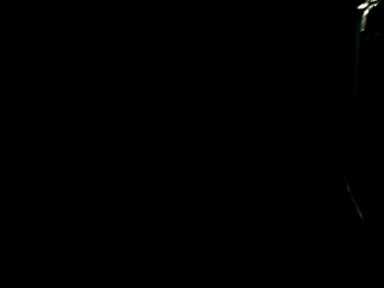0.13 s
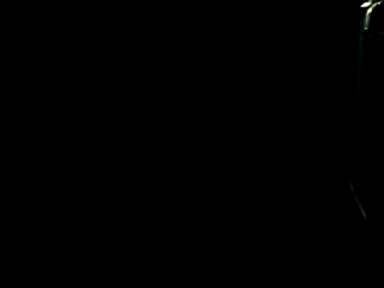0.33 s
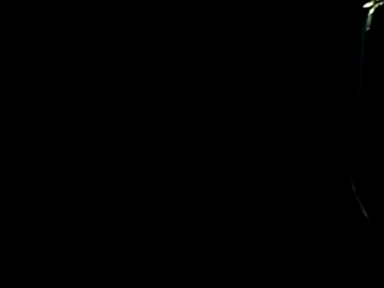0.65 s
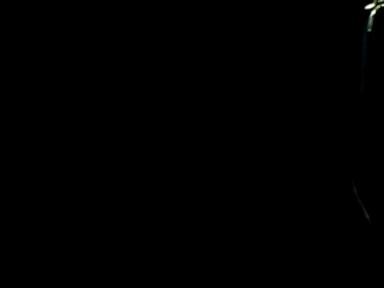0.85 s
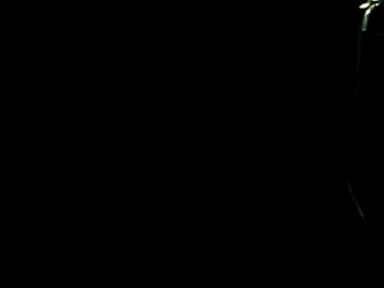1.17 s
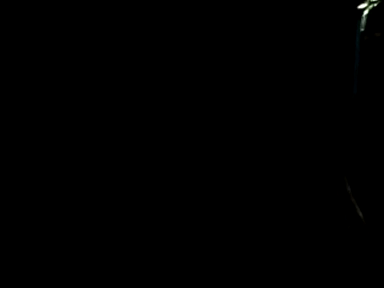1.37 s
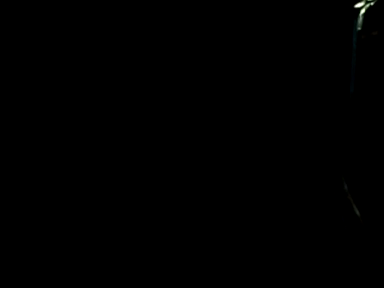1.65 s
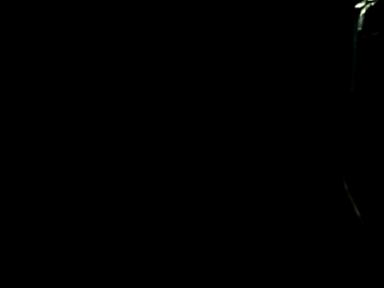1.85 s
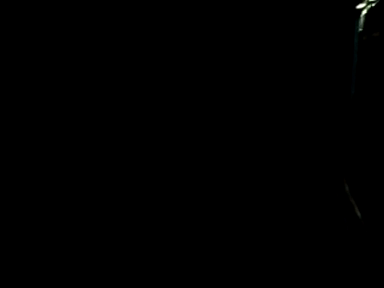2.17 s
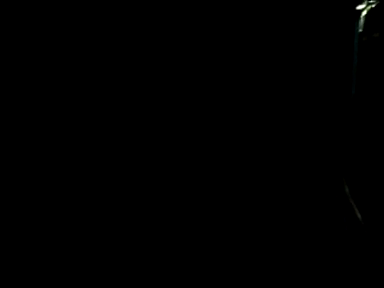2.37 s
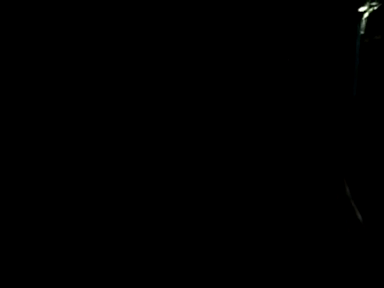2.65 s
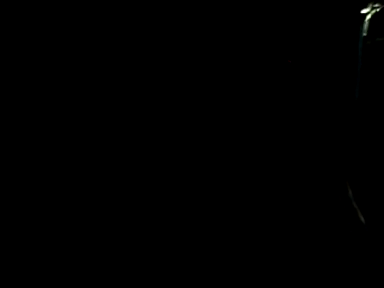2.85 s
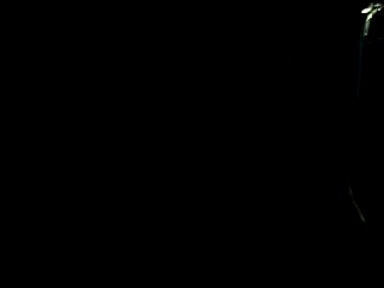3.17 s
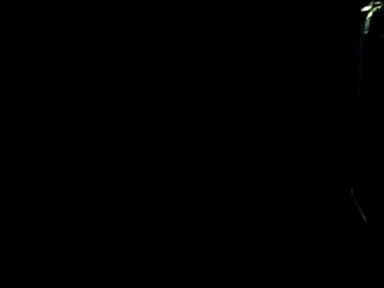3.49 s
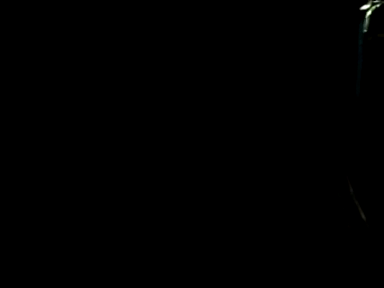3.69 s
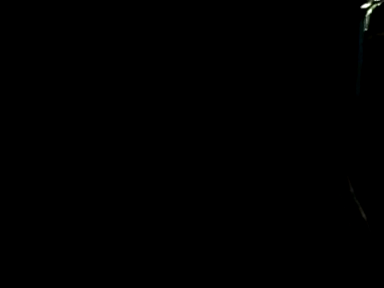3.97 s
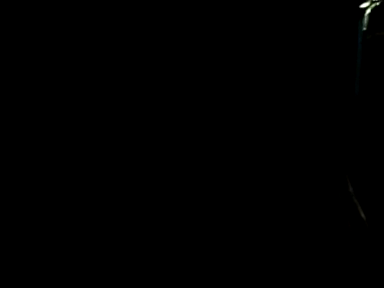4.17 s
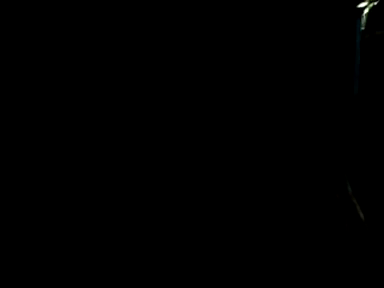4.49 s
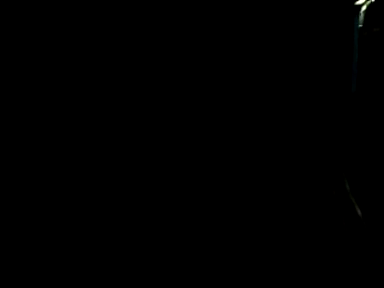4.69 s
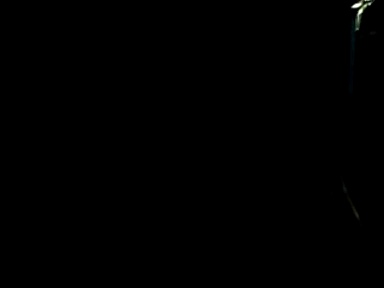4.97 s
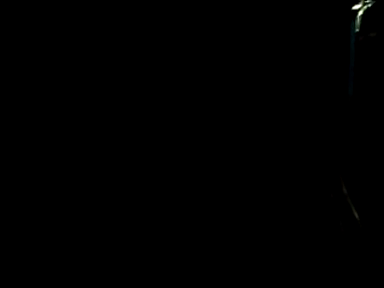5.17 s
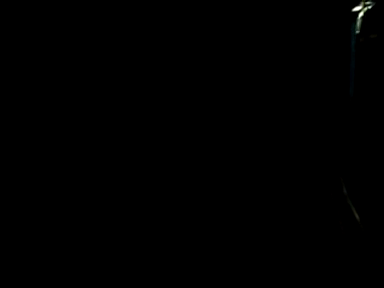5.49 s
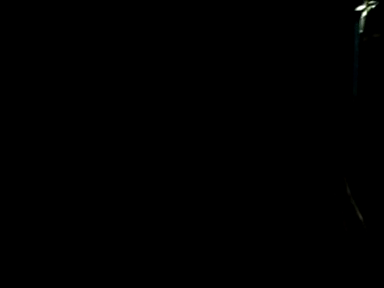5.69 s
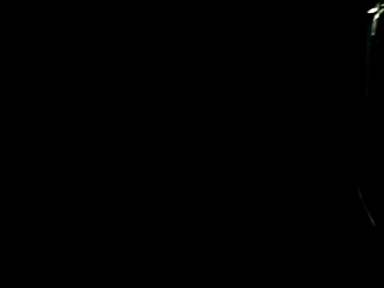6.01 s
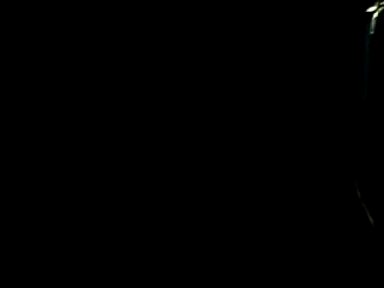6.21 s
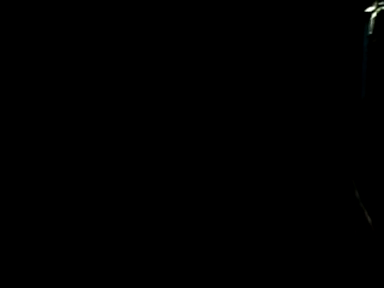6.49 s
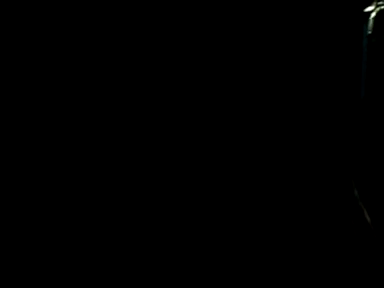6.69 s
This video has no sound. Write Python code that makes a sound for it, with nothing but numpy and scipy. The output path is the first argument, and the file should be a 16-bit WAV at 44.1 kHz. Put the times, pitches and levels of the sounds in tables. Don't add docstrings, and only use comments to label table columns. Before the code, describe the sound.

Wheels pound rough track beneath a passenger coach: uneven sharp clacks, clustered dull thumps, short bright rattles, over a steady low rumbling growl.

```python
import sys
import numpy as np
from scipy import signal
from scipy.io import wavfile

SR = 44100
rng = np.random.default_rng(int(sys.argv[2]) if len(sys.argv) > 2 else 0)


def linear_from_db(decibels):
    return 10 ** (np.asarray(decibels, float) / 20)


def wrap_up_sound(samples):
    columns = np.atleast_2d(samples).T
    tamed = np.clip(columns, -1, 1)
    steps = np.round(tamed * 32767).astype(np.int16)
    wavfile.write(sys.argv[1], SR, steps)


N = 302085


def rms_one(x):
    return x / np.sqrt(np.mean(x ** 2) + 1e-20)


def drift(rate_hz):
    r = np.exp(-80 * np.pi * rate_hz / SR)
    noise = rng.standard_normal(N // 40 + 2002)
    slow = signal.lfilter([1], [1, -2 * r, r * r], noise)[2000:]
    return np.interp(np.arange(N) / 40, np.arange(len(slow)), rms_one(slow))


def resonate(x, hz, width_hz):
    r = np.exp(-np.pi * width_hz / SR)
    return signal.lfilter([(1 - r * r) / 2, 0, (r * r - 1) / 2],
                          [1, -2 * r * np.cos(2 * np.pi * hz / SR), r * r], x)


def ringing_noise(noise, hz, width_hz):
    return rms_one(resonate(resonate(noise, hz, width_hz), hz, width_hz))


def grit(per_s, spread_db):
    sizes = linear_from_db(spread_db * np.minimum(rng.exponential(1, N), 4)) * rng.choice([-1, 1], N)
    hits = rng.random(N) < per_s / SR
    return rms_one(sizes * hits + 1e-18)


def coloured(sources, spectrum, patchy_db, tilt_db=0):
    hz_at, db_at = np.transpose(spectrum)
    octaves = np.log2(hz_at[-1] / hz_at[0])
    edges = hz_at[0] * 2 ** np.arange(0, octaves + 1 / 3, 1 / 3)
    edges = edges[edges < 13000]
    plain, tilted = 0, 0
    for k, (low, high) in enumerate(zip(edges, edges[1:])):
        hz = np.sqrt(low * high)
        band_pass = signal.butter(2, [low, high], "band", fs=SR, output="sos")
        band = signal.sosfilt(band_pass, sources[k % 2])
        level_db = np.interp(np.log(hz), np.log(hz_at), db_at)
        band = band * linear_from_db(level_db + patchy_db * drift(11.4))
        plain = plain + band
        octaves_from_middle = np.log2(hz ** 2 / edges[0] / edges[-1]) / 2
        tilted = tilted + band * linear_from_db(tilt_db * octaves_from_middle)
    return tilted / np.std(plain)


def swells(starts, holds, levels_db, rise_s, db_per_s):
    out, t = np.zeros(N + SR), np.arange(SR) / SR
    for s, hold, db in zip(starts, np.abs(holds), levels_db):
        i = round(s * SR)
        rise = max(rise_s + 0.14 * hold, .001)
        onset = np.sin(np.pi / 2 * np.minimum(t / rise, 1)) ** 2
        out[i:i + SR] += onset * linear_from_db(db - db_per_s * np.maximum(t - rise_s - hold, 0))
    return out[:N]


# start in seconds, hold in seconds, growl in dB, rattle in dB, sizzle in dB.
JOINTS = [
    (0.966, 0.0027, -8.5, -34.5, -25.5),
    (1.45, 0.0027, -14, -31, -31),
    (2.378, 0.03, -16, -33.5, -30.5),
    (4.082, 0.037, -33, -51, -47),
    (5.765, .04, -38, -46, -44),
    (6.391, 0.016, -21.5, -42.5, -34),
]
PATCHES = [(0.097, 0.086, -28, -45, -42.5), (0.27, 0.19, -62, -56, -74), (0.57, 0.021, -60, -48.5, -45),
           (0.908, 0.015, -31, -45.5, -55), (1.39, 0.018, -55, -54.5, -77), (1.92, 0.044, -54.5, -57, -57),
           (2.87, 0.024, -14, -35, -37), (2.917, 0.069, -17.5, -30.5, -33), (3.401, 0.046, -20, -39, -41),
           (3.474, 0.007, -26, -51, -44), (4.361, 0.079, -20, -30.5, -40), (4.585, 0.015, -30.5, -51, -65),
           (4.635, 0.013, -46, -51, -58), (4.814, .01, -32.5, -49.5, -59),
           (4.87, 0.078, -23.5, -41.5, -42.5), (5.03, 0.01, -46, -45.5, -62),
           (5.254, 0.032, -40, -46, -38.5), (5.59, 0.014, -51, -56, -58), (5.83, 0.057, -32, -49, -51),
           (5.894, 0.035, -36, -38, -38.5), (6.235, 0.06, -42, -57, -51), (6.35, .02, -32.5, -51, -52),
           (6.528, 0.027, -30.5, -47.5, -31), (6.714, 0.042, -30.5, -48, -46)]


def jolted(answer, axis, lag_s=0):
    total = 0
    for table, (rise_s, db_per_s) in zip((JOINTS, PATCHES), answer):
        columns = np.transpose(table)
        total = total + swells(columns[0] + lag_s, columns[1], columns[axis], rise_s, db_per_s)
    return total


# time in seconds, level in dB of the steady rattle it causes.
RAIL_ROUGHNESS = [(0.0, -46.5), (0.34, -47), (1.09, -47), (1.2, -52.5), (1.95, -56.5), (2.35, -46.5),
                  (2.5, -48.5), (3.43, -49), (3.79, -52.5), (4.06, -50), (4.56, -48.5), (4.67, -51.5),
                  (5.15, -49.5), (5.42, -48.5), (6.6, -48), (6.85, -50)]


def roughness_db():
    s, db = np.transpose(RAIL_ROUGHNESS)
    return np.interp(np.arange(N) / SR, s, db)


# start in seconds, peak in dB.
TICKS = [
    (3.3623, -26),
    (3.6546, -41),
    (3.7234, -34),
    (6.5416, -30),
]


def ticks():
    s, db = np.transpose(TICKS)
    clicks = np.zeros(N) + 1e-18
    clicks[np.round(s * SR).astype(int)] = linear_from_db(db + 4.5)
    return resonate(clicks, 2750, 500) * 8.2 + resonate(clicks, 3700, 3500)


# start in seconds, hold in seconds, level in dB, pitch in Hz.
SQUEAKS = [
    (0.59, 0.033, -55, 2590),
    (1.542, 0.072, -54, 6940),
    (3.93, 0.036, -62, 4530),
    (6.212, .015, -46, 1222),
    (6.54, .05, -53, 6550),
]


def squeaks():
    rub, out = rng.standard_normal(N), 0
    for s, hold, db, hz in SQUEAKS:
        tone = ringing_noise(rub, hz, 0.016 * hz)
        out = out + swells([s], [hold], [db], rise_s=.015, db_per_s=158) * tone
    return out


# start in seconds, low tones in dB, middle tone in dB, high tones in dB.
WHEEL_BLOWS = [
    (0.972, -50, -55, -43),
    (1.455, -63, -64, -52),
    (2.388, -50, -60, -49),
    (2.95, -69, -45, -69),
    (4.4, -70, -56, -64),
    (6.4, -55, -50.5, -56),
    (6.55, -64, -69, -64),
]
# pitch in Hz, width in Hz, level in dB, time to fade by 60 dB in seconds.
WHEEL_TONES = [(1620, 70, -3, 1.0), (2120, 55, -3, 1.1), (2930, 90, -8, .8), (3400, 50, 3, .45),
               (4900, 130, -8, .35), (6900, 260, 2, .65)]


def wheels():
    out, blows = 0, np.zeros((3, N))
    starts = [round(row[0] * SR) for row in WHEEL_BLOWS]
    blows[:, starts] = linear_from_db(np.array(WHEEL_BLOWS)[:, 1:].T)
    for hz, width_hz, db, t60 in WHEEL_TONES:
        group = np.searchsorted([3000, 4000], hz)
        ring = signal.lfilter([1], [1, -linear_from_db(-60 / (t60 * SR))], blows[group] + 1e-18)
        strength = ring + linear_from_db(-61.5 - 10.5 * group)
        tone = ringing_noise(rng.standard_normal(N), hz, width_hz)
        out = out + linear_from_db(db + 2.0 * drift(14)) * strength * tone
    return out


# pitch in Hz, width in Hz, level in dB.
BODY = [(40.2, 11.5, -3), (83, 17.4, -4.5), (106.3, 14.4, -2.5)]
# start in seconds, upper resonances in dB, lowest resonance in dB.
LURCHES = [(0.1, -36, -41), (0.5, -41.5, -51), (0.63, -62, -33), (0.73, -44, -42), (0.96, -30, -21.5),
           (1.188, -65, -46), (1.44, -26, -26.5), (2.39, -40, -33), (2.54, -39, -35), (2.62, -34, -63),
           (2.91, -26, -30), (3.06, -29.5, -30), (3.46, -32.5, -31), (3.6, -52, -33), (4.11, -30.5, -39),
           (4.4, -25.5, -57), (4.62, -29.5, -26), (4.92, -40, -52), (5.25, -36, -35), (5.75, -34.5, -31),
           (5.87, -30, -39), (6.02, -37.5, -44), (6.4, -23, -28), (6.51, -50, -25), (6.6, -34, -55),
           (6.78, -29, -33.5)]


def boom():
    s, upper_db, lowest_db = np.transpose(LURCHES)
    modes = []
    for hz, width_hz, db in BODY:
        push = rng.standard_normal(N + SR)
        mode = resonate(resonate(push, hz, width_hz), hz, 3.7 * width_hz)[SR:]
        modes.append(linear_from_db(db) * rms_one(mode))
    lowest, upper = modes[0], rms_one(sum(modes[1:]))
    lowest_lurch = swells(s, 0 * s, lowest_db, rise_s=0.037, db_per_s=67.5)
    upper_lurch = swells(s, 0 * s, upper_db, rise_s=0.037, db_per_s=67.5)
    return (linear_from_db(-35) + lowest_lurch) * lowest + (linear_from_db(-39.5) + upper_lurch) * upper


# pitch in Hz, width in Hz, level in dB.
SIZZLE = [(9250, 500, -2), (9700, 450, 0), (10100, 500, -1), (10450, 500, -4)]
# rise in seconds, fade in dB per second.
SIZZLE_ANSWER = [(.04, 97), (.04, 140)]


def sizzle():
    jingle = 0
    for hz, width_hz, db in SIZZLE:
        tone = ringing_noise(rng.standard_normal(N), hz, width_hz)
        jingle = jingle + linear_from_db(db + 2.5 * drift(9.8)) * tone
    return linear_from_db(-8) * jolted(SIZZLE_ANSWER, axis=4) * rms_one(jingle)


# frequency in Hz, level in dB per Hz.
RATTLE = [(530, -11), (900, -10.5), (1240, -15.5), (1600, -7.5), (1760, -11.5), (2140, -11), (2370, -11.5),
          (6330, -14.5), (9660, -14.5), (10600, -24), (13800, -54), (22000, -120)]
# rise in seconds, fade in dB per second.
RATTLE_ANSWER = [(.008, 102.6), (.022, 129.6)]


def rattle():
    lag_s = 0.0021
    steady = linear_from_db(roughness_db() + 1.0)
    jolts = jolted(RATTLE_ANSWER, axis=3, lag_s=lag_s)
    s, growl_db = np.array(JOINTS)[:, [0, 2]].T
    slap_level_db = 0.25 * np.minimum(growl_db + 14, 0)
    slap_fade = 20 / np.log(10) / .015
    slap = swells(s + lag_s, 0 * s, slap_level_db, 0.0087, slap_fade)
    still_tilt, shaken_tilt, slap_tilt = -3, -1, -7
    tilt_db = (still_tilt * steady + shaken_tilt * jolts) / (steady + jolts) + slap_tilt * slap
    contacts = [grit(per_s=9000, spread_db=1.5) for side in range(2)]
    noise = coloured(contacts, RATTLE, patchy_db=0.83, tilt_db=tilt_db)
    clatter_db = 1.2 * drift(35)
    return (steady + jolts * linear_from_db(8.5 * slap + clatter_db)) * noise


# frequency in Hz, level in dB per Hz.
BOGIE = [(76, -29), (130, -6.5), (146, 0), (258, 2.5), (325, -2.5), (401, -5.5), (859, -19.5), (1100, -28),
         (1300, -21), (1690, -76), (2860, -120)]
# rise in seconds, fade in dB per second.
GROWL_ANSWER = [(.008, 301), (.02, 244)]


def growl():
    rough_db = roughness_db()
    steady = linear_from_db(-33 + 0.68 * (rough_db - rough_db.mean()))
    jolts = jolted(GROWL_ANSWER, axis=2)
    still_tilt, shaken_tilt = 1.96, 3.34
    tilt_db = (still_tilt * steady + shaken_tilt * jolts) / (steady + jolts)
    rough = [grit(per_s=2500, spread_db=1.5) for side in range(2)]
    return (steady + jolts) * coloured(rough, BOGIE, patchy_db=2.0, tilt_db=tilt_db)


# start in seconds, peak in dB,
# pitch in Hz, crack in dB relative to the peak, time to fade by 60 dB in seconds.
KNOCKS = [(0.971, 7.5, 560, -22, 0.016), (0.985, -6.5, 800, 0, 0.034), (1.454, 5, 495, -17, 0.035),
          (1.463, -7, 622, -30, 0.061), (2.39, -16, 560, -16, 0.066), (2.401, -5, 511, -3, 0.067),
          (5.766, -8.5, 264, -15, 0.066), (6.399, -16, 510, -14, 0.042), (5.285, -17, 288, -28, 0.16),
          (5.335, -13, 266, -28, 0.091), (5.908, -6, 198, -26, 0.12), (5.918, -15, 510, -16, 0.041),
          (3.409, 9, 445, -28.5, 0.035), (3.437, 2, 430, -26, 0.086), (6.413, -12, 262, -9, 0.046),
          (0.9715, -6.5, 937, -16, 0.066), (1.4535, -5.5, 1006, -11, 0.08), (2.393, -11, 1150, -17, 0.066),
          (6.4, -19.5, 1493, -14, 0.07)]
# start in seconds, peak in dB, pitch in Hz.
THUMPS = [(0.114, -12, 330), (0.139, -11, 326), (0.168, -6.5, 349), (0.193, -10.5, 275), (2.881, -15, 370),
          (2.921, -3, 428), (2.94, -2, 274), (2.964, 1, 357), (2.987, -1, 406), (3, 0, 278),
          (3.02, -7.5, 394), (3.459, -3.5, 478), (3.48, -1.5, 403), (3.492, 3.5, 270.4), (3.53, -7, 264),
          (4.091, -8.5, 289), (4.368, -4.5, 450), (4.398, -2, 397), (4.437, -6, 407), (4.465, -5, 345),
          (4.597, -10, 288), (4.876, -6, 382), (4.897, -8, 276), (4.915, -3.5, 299), (4.946, -2, 390),
          (4.966, -4.5, 370), (4.983, -8, 339.5), (5.903, -20, 250), (6.549, -8.5, 390), (6.725, -7.5, 242)]


def knocks():
    out, t = np.zeros(N), np.arange(SR // 4) / SR
    ratios = np.array([[.74], [1.01], [1.3], [1.85]])
    lags_s = np.array([[.003], [.0015], [.0007], [.0002]])
    shares = linear_from_db([[-8], [-1], [-6], [-15]])
    thump_crack_db, thump_t60 = -19.5, .11
    blows = list(KNOCKS) + [(s, db, hz, thump_crack_db, thump_t60) for s, db, hz in THUMPS]
    chance = rng.standard_normal((len(blows), 2, len(ratios), 1))
    crack_band = signal.butter(1, [800, 3500], "band", fs=SR, output="sos")
    hiss = signal.sosfilt(crack_band, rng.standard_normal(N + len(t)))
    for (s, db, hz, crack_db, t60), (detune, strength) in zip(blows, chance):
        i = round(s * SR)
        late = np.maximum(t - lags_s, 0)
        rise = 1.1 / hz
        fade = linear_from_db(-60 * late * np.sqrt(ratios) / max(t60, .01))
        swell = (1 - np.exp(-(late / rise) ** 2)) * fade
        tones = np.sin(2 * np.pi * hz * ratios * (1 + 0.06 * detune) * late)
        modes = shares * linear_from_db(2.0 * strength) * swell * tones
        crack_swell = (1 - np.exp(-(t / rise) ** 2)) * linear_from_db(-60 * t / .11)
        crack = linear_from_db(crack_db - 1.5) * hiss[i:i + len(t)] * crack_swell
        out[i:i + len(t)] += (linear_from_db(db - 8) * (modes.sum(axis=0) + crack))[:N - i]
    return out


def scene():
    background = ticks() + squeaks() + wheels() + boom()
    return (background + sizzle() + rattle() + growl() + knocks())[None]


def roll_off(x):
    return signal.sosfilt(signal.butter(12, 11640, fs=SR, output="sos"), x)


def record(dry):
    rounded = 1.1 * np.tanh(dry / 1.1)
    low_pass = signal.ellip(12, .5, 75, 10520, fs=SR, output="sos")
    mix = signal.sosfilt(low_pass, rounded)
    return roll_off(mix)


dry = scene()
out = record(dry)
wrap_up_sound(out)
```